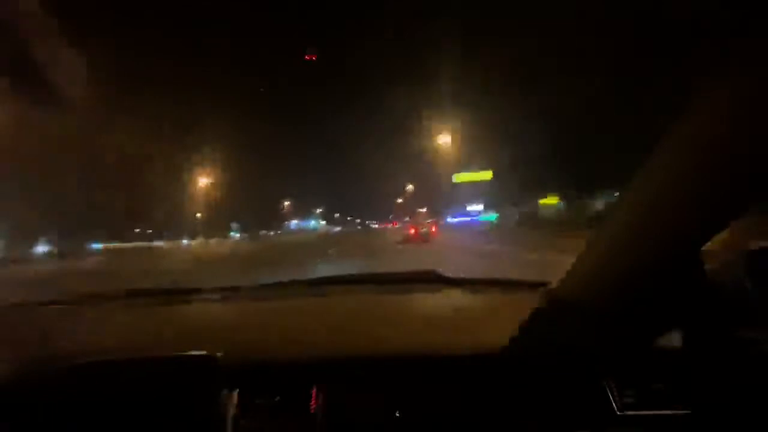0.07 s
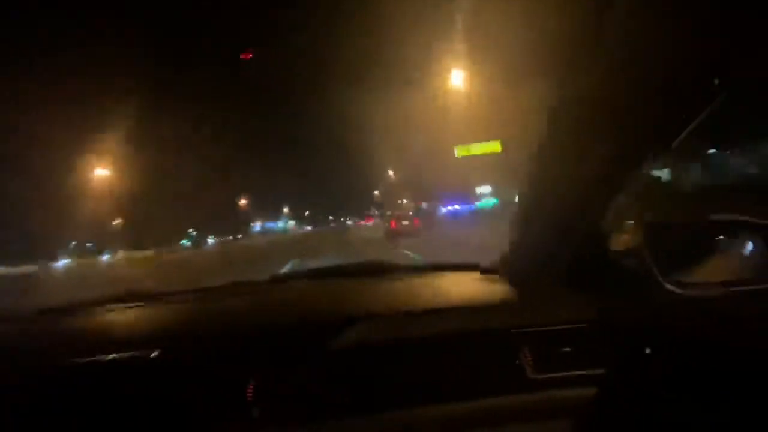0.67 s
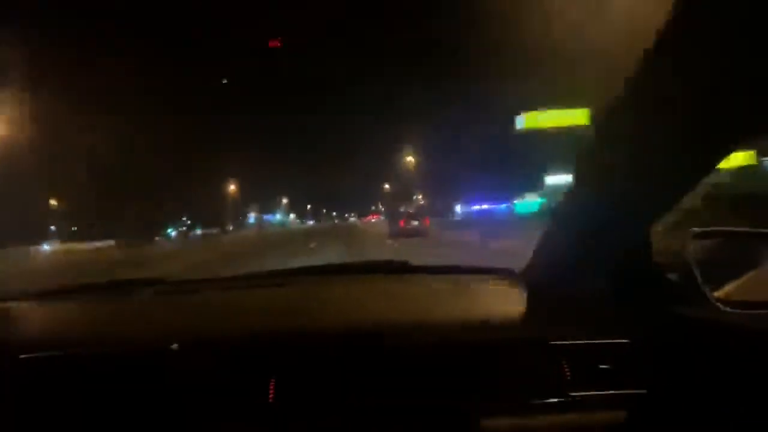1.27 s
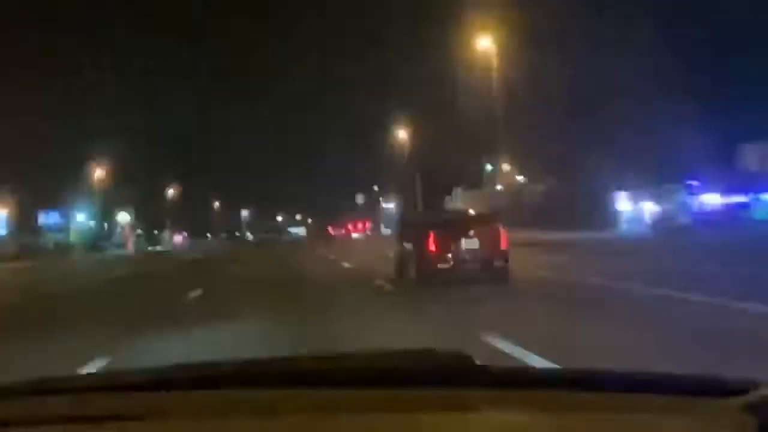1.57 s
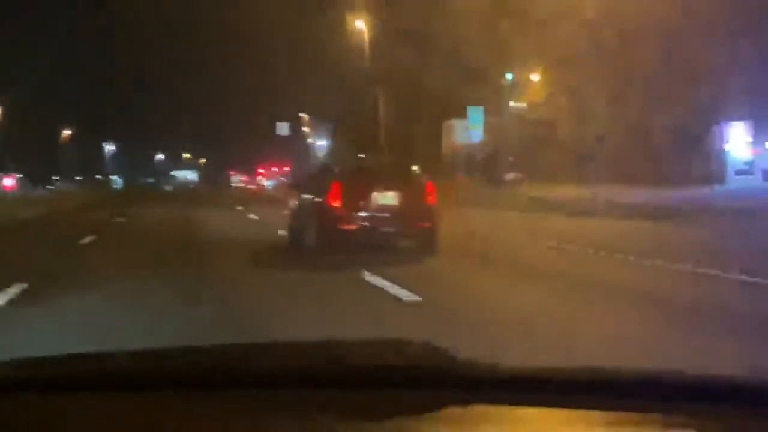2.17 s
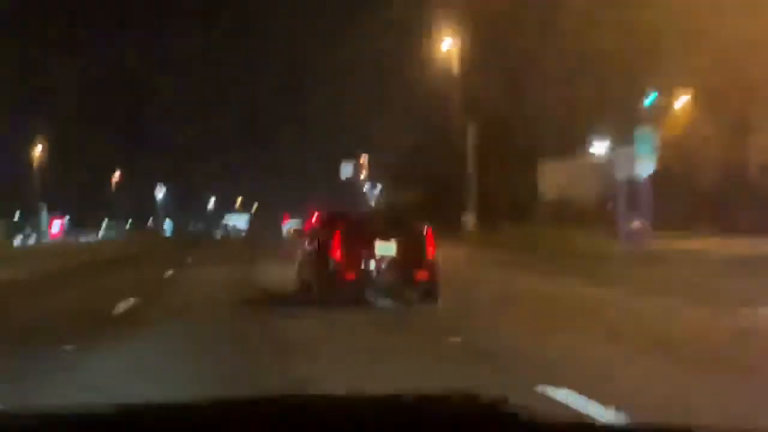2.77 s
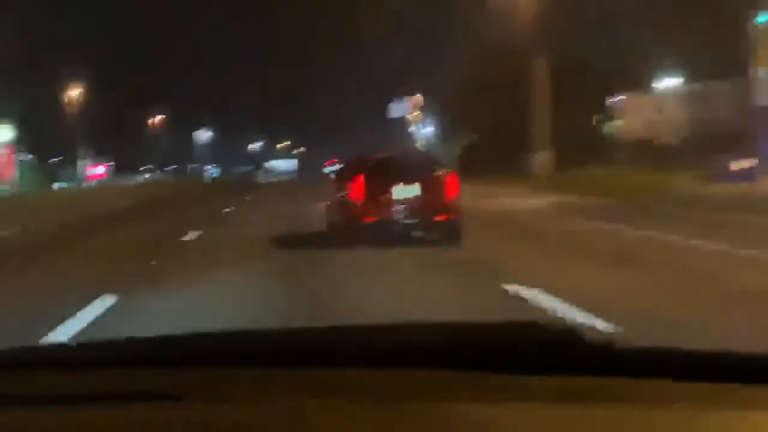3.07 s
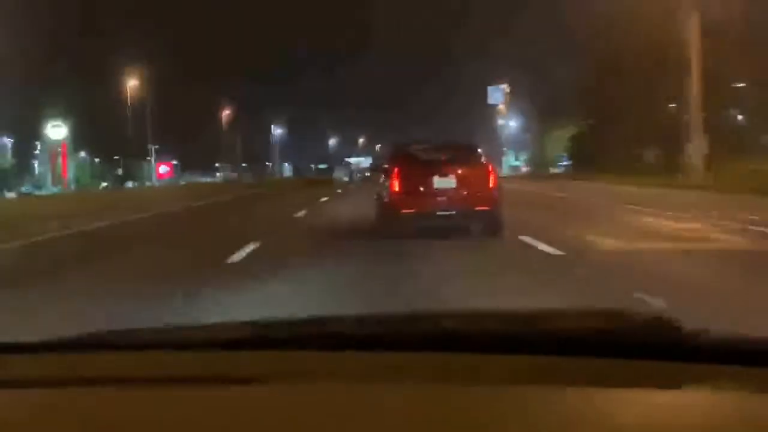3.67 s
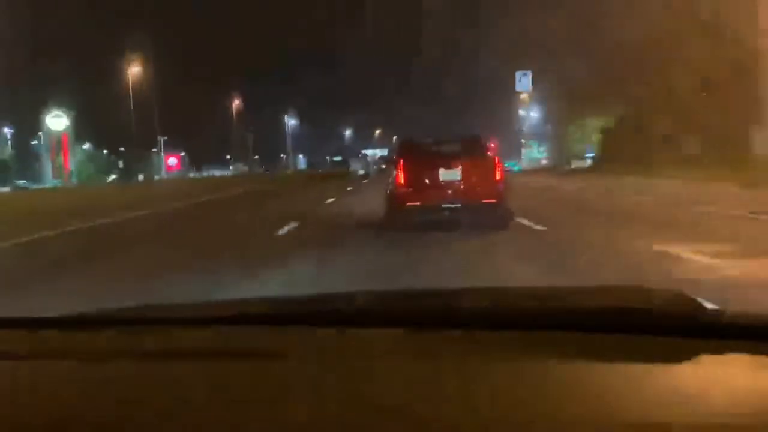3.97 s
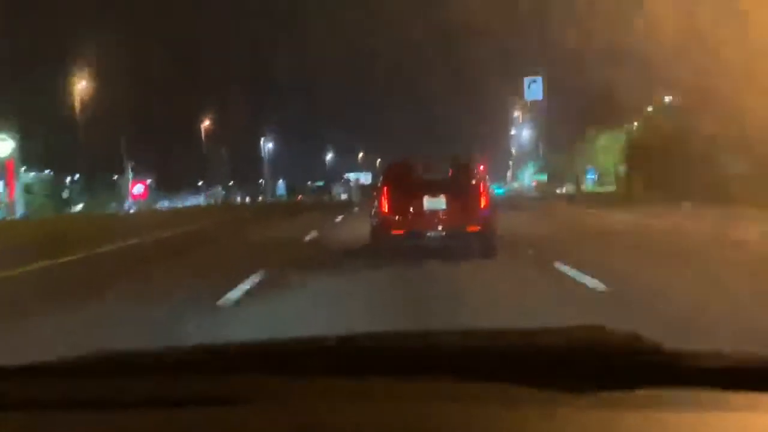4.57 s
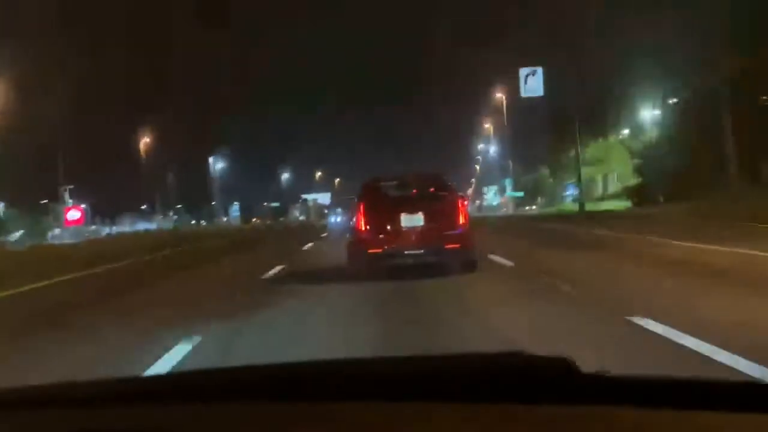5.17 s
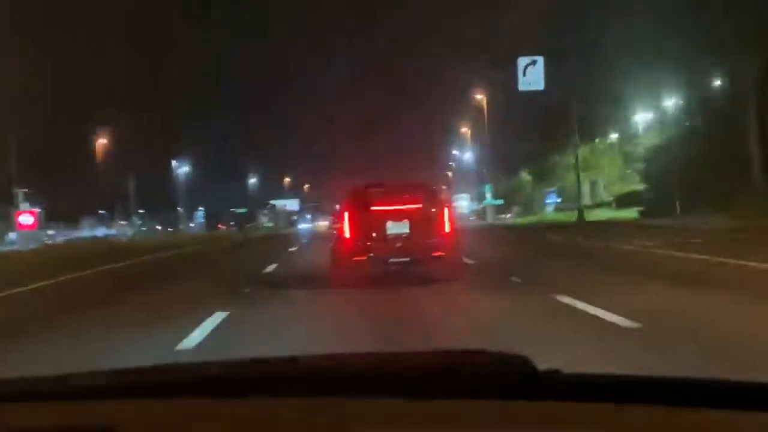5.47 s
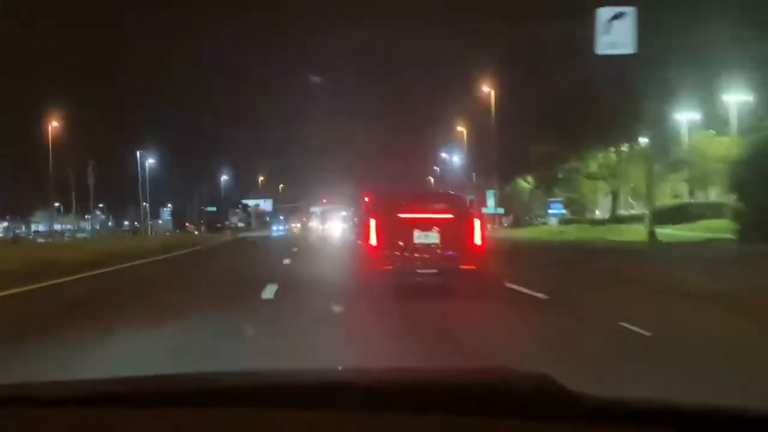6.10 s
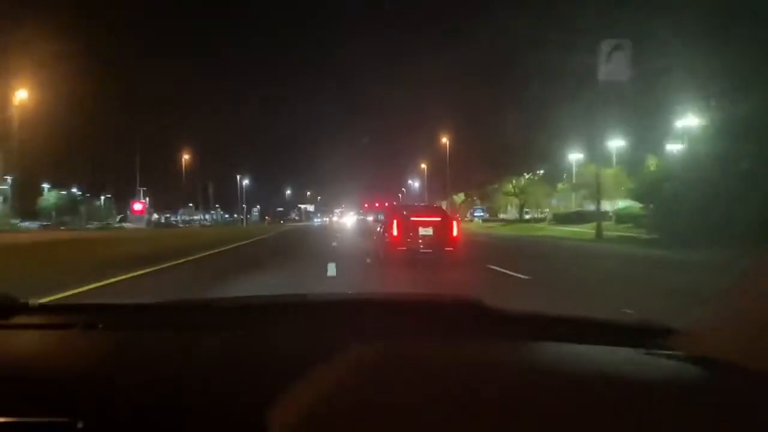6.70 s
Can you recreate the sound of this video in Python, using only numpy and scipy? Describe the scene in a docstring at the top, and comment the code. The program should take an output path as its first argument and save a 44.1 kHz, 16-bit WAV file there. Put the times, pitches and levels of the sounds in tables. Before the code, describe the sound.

A low road rumble fills the cabin of a moving car for about seven seconds, with steady tyre roar and a faint hiss of air. The engine pulls gently at first, and three barely audible chirps come in the first 1.2 seconds. At about 1.4 seconds the stereo sound narrows and turns a little duller. Around 2 seconds the engine eases into coasting, and a hum swells and fades by 3 seconds. The tyres ring faintly near 3.3 seconds. After a soft bump, a deep, wavering drone sets in at about 4.3 seconds and stays as the loudest sound to the end. Plastic trim ticks lightly at 4.8 and 5.5 seconds. Soft bumps come between 5.5 and 5.9 seconds, with a faint tyre whine that lingers as the engine sinks in pitch. The sound widens slightly just before the end.

```python
"""A car rumbling along a wide road at night, heard from inside on a camera's stereo microphone.
The road shakes the body, tyres roar through the floor and air hisses along the glass. The engine pulls
gently, then coasts and slows, its orders swelling in the cabin's resonances; a hum comes and goes and
a deep drone sets in. In the cabin, trim ticks twice and there are three faint chirps.
The camera zooms in and, at the end, partly out again, which narrows and widens the microphone's pickup."""
import sys
import numpy as np
from scipy.fft import rfft, irfft, next_fast_len
from scipy.io import wavfile
from scipy.ndimage import uniform_filter1d, minimum_filter1d, map_coordinates

SR = 44100
rng = np.random.default_rng(int(sys.argv[2]) if len(sys.argv) > 2 else 0)


def bounce(signal):
    """Save signal as a 16-bit WAV file at the path given by the first command-line argument."""
    frames = np.transpose(np.atleast_2d(signal))
    limited = np.clip(frames, -1, 1)
    pcm = np.round(limited * 32767).astype(np.int16)
    wavfile.write(sys.argv[1], SR, pcm)


N = 301644


def amp(db):
    """Decibels to gain."""
    return 10 ** (np.asarray(db) / 20)


def unit(x):
    """Scaled to rms 1."""
    return x / np.sqrt(np.mean(x ** 2) + 1e-20)


def along(points, hz):
    """Each column after the first, read at hz on a log frequency axis."""
    knots_hz, *columns = np.transpose(points)
    return np.array([np.interp(np.log(hz + 1), np.log(knots_hz + 1), c) for c in columns])


def curves(rows):
    """One value per sample for each column after the time."""
    seconds, *columns = np.transpose(rows)
    return [np.interp(np.arange(N) / SR, seconds, c) for c in columns]


def wobble(rate):
    """A smooth random curve, rate knots a second."""
    knots = rng.standard_normal(int(N * rate / SR) + 4)
    return map_coordinates(knots, [np.arange(N) * rate / SR])


def swell(start, attack, hold=np.inf, release=1):
    """A gain that rises from 0 to 1, holds and falls back; times in seconds."""
    t = np.arange(N) / SR - start
    return np.clip(t / attack, 0, 1) * np.clip(1 - (t - attack - hold) / release, 0, 1)


def since(start):
    """Seconds since a moment, 0 before it."""
    return np.maximum(np.arange(N) / SR - start, 0)


def bell(centre, width):
    """A smooth rise to 1 and fall around a moment; width is the half length in seconds."""
    return np.exp(-((np.arange(N) / SR - centre) / width) ** 2)


def filtered(x, response):
    """x shaped by a gain that depends on frequency."""
    size = next_fast_len(N + 8192)
    return irfft(rfft(x, size) * response(np.fft.rfftfreq(size, 1 / SR)), size)[..., :N]


def rush(spectrum, ripple_db=0, spacing_hz=60):
    """Two unrelated noises of rms 1 with the given spectrum; reflections off the glass can ripple it."""
    knots = rng.standard_normal(2048)
    ripple = lambda hz: np.interp(hz / spacing_hz, np.arange(len(knots)), knots)
    response = lambda hz: amp(along(spectrum, hz) + ripple_db * ripple(hz))
    return unit(filtered(rng.standard_normal((2, N)), response))


def steady(noise):
    """Noise held at rms 1 from moment to moment."""
    power = uniform_filter1d(uniform_filter1d(noise ** 2, size=4000), size=4000)
    return noise / np.sqrt(np.abs(power) + 1e-6)


def sides(balance_db):
    """Left and right gains of mean power 1; the balance is left over right."""
    gains = amp(np.array([balance_db, -balance_db]).reshape(2, -1) / 2)
    return gains / np.sqrt(np.mean(gains ** 2, axis=0))


def tone(hz, db, balance_db, lead=0):
    """A gliding sine; the cabin's standing waves give each side its own level and phase."""
    phase = 2 * np.pi * (np.cumsum(hz) / SR + rng.random())
    return np.sqrt(2) * amp(db) * sides(balance_db) * np.sin(phase + np.array([[lead], [-lead]]) / 2)


def pickup(field, alike, balance_db):
    """Left and right spectra from two unrelated ones, as alike as asked."""
    turn = np.arccos(np.clip(alike, -1, 1)) / 2
    mid, side = field[0] * np.cos(turn), field[1] * np.sin(turn)
    return sides(balance_db) * np.array([mid + side, mid - side])


def microphone(field, wide_lag_s=0.000284):
    """Zooming in narrows the pickup: diffuse noise turns duller and more mono, the sides fall in step."""
    # Each row: frequency in Hz; wide, the left-right likeness, balance in dB and gain in dB;
    # zoomed in, the likeness and balance in dB.
    pattern = [(60, 0.84, -5, 0.5, 0.97, -1.5), (130, 0.88, -3.5, 1.5, 1, -3),
               (260, 0.51, -3.5, 4.5, 0.65, -2.5), (505, 0.33, 0.5, 3.5, 0.33, -1),
               (706, 0.29, -2.5, 2.5, 0.043, -1.5), (1015, 0, 1.5, 4.5, 0.3, -0.5),
               (1770, 0.35, 3.5, 2, 0.25, 3.5), (2780, 0.13, 6, 14, 0.87, -1.5),
               (3750, 0.29, 5.5, 9.5, 1, 0), (4160, 0.088, 5, 11, 1, 0), (4900, 0, 5, 6.5, 1, 0.5),
               (5800, 0.031, 5, 13, 1, -0.5), (6940, 0, 5, 11, 1, 0), (8430, 0.28, -0.5, 12.5, 0.079, 1),
               (10460, 0.3, -2, 2, 0.25, 0), (13600, 0.5, 0, -1, 0.092, 0)]
    # Each row: time in seconds, zoom from 0 (wide) to 1 (narrow).
    zoom_moves = [(0, 0.12), (1, 0.14), (1.425, 0.023), (1.445, 0.99), (6.59, 1), (6.64, 0.49),
                  (6.84, 0.29)]
    size = next_fast_len(N + 8192)
    spectra, hz = rfft(field, size), np.fft.rfftfreq(size, 1 / SR)
    wide_alike, wide_balance, wide_db, zoom_alike, zoom_balance = along(pattern, hz)
    wide = irfft(amp(wide_db) * pickup(spectra, wide_alike, wide_balance), size)[:, :N]
    narrow = irfft(pickup(spectra, zoom_alike, zoom_balance), size)[:, :N]
    zoom, = curves(zoom_moves)
    left, right = (1 - zoom) * wide + zoom * narrow
    late_left = map_coordinates(left, [np.arange(N) - (1 - zoom) * wide_lag_s * SR], mode="mirror")
    return np.array([late_left, right])


def chirps(waver=0.017):
    """Short, unsteady chirps in the cabin, perhaps rubbing trim, barely rise above the road noise."""
    # Each row: time in seconds, pitch in Hz, level in dB.
    squeaks = [(0.235, 1190, -37), (0.608, 1200, -40), (1.19, 690, -32)]
    return sum(bell(s, 0.016) * tone(hz * (1 + waver * wobble(150)), db, balance_db=-1)
               for s, hz, db in squeaks)


def ticks(rise_s=0.00068, hold_s=0.0023, snap_s=0.0006, tilt_from_hz=4500):
    """Plastic trim in the cabin snaps free, rubs on briefly and knocks the panel behind it."""
    # Each row: start in seconds, level in dB, seconds to fall 60 dB, treble tilt in dB per octave,
    # knock against the slip in dB, lift of the snap in dB.
    slips = [(4.8003, -33.5, 0.043, -4, 0, 6), (5.5248, -35.5, .032, -2, 5, 2),
             (5.5324, -34.5, .047, -3.5, 0, 4), (5.558, -37.5, .065, -24, -7, 0)]
    # Spectra of the slip and the panel's knock. Each row: frequency in Hz, relative level in dB.
    slip_spectrum = [(2500, -17), (3900, -9.5), (4450, 2.5), (5400, 0), (6000, -2.5), (6700, 0), (7800, -9),
                     (9500, -7.5), (11200, -5), (12300, -13), (15000, -5), (16000, -13)]
    panel_colour = [(400, -17), (750, -8), (1250, -6), (1750, -1), (2350, -0.5), (3100, -11), (6000, -45)]
    out, t = np.zeros((2, N)), np.arange(4096) / SR
    hz = np.fft.rfftfreq(len(t), 1 / SR)
    burst = lambda db: unit(irfft(amp(db) * rfft(rng.standard_normal((2, len(t))))))
    for start, db, t60, tilt, knock_db, snap_db in slips:
        slip = burst(along(slip_spectrum, hz) + tilt * np.log2(np.maximum(hz / tilt_from_hz, 1)))
        snap = amp(snap_db * np.exp(-((t - rise_s) / snap_s) ** 2))
        knock = amp(knock_db) * burst(along(panel_colour, hz))
        envelope = np.minimum(t / rise_s, 1) * amp(db - 60 * np.maximum(t - hold_s, 0) / t60)
        mid, side = envelope * (snap * slip + knock)
        out[:, round(start * SR):][:, :len(t)] += [mid + 0.55 * side, mid - 0.5 * side]
    return out


def hum(start_s=1.96, pitch_hz=218.8, sag_hz_per_s=4.3, octave_db=-12.5, balance_db=-4):
    """A hum with a faint octave, right of centre, swells and fades as the pedal lifts, sinking a little."""
    hz = pitch_hz - sag_hz_per_s * since(start_s)
    db = -24.8 + 1.3 * wobble(12)
    envelope = swell(start_s, attack=0.24, hold=0.36, release=0.36)
    return envelope * (tone(hz, db, balance_db) + tone(2 * hz, db + octave_db, balance_db))


def drone(pitch_hz=121, overshoot_hz=11.5, settle_s=0.23, swing_s=0.51, sag_hz_per_s=0.91):
    """A low, wavering tone comes in sharp, swings down to its pitch and fills the cabin."""
    # It surges and falters before it holds. Each row: time in seconds, level in dB.
    surges = [(4.38, -13.5), (4.5, -11), (4.69, -16), (4.77, -10.5), (4.88, -11), (5.02, -14),
              (5.15, -11.5), (6.2, -11.5), (6.84, -11)]
    t = since(4.37)
    settling = overshoot_hz * np.exp(-t / settle_s) * np.cos(2 * np.pi * t / swing_s)
    hz = pitch_hz + settling - sag_hz_per_s * since(5.41)  # sinks as the car brakes
    db = curves(surges)[0] + 1.1 * wobble(15) + 0.7 * wobble(60)
    return swell(4.29, attack=0.11) * tone(hz, db, balance_db=-1)


def engine(lift_off_s=1.55, overrun_s=2.23, coast_under_load_db=-21.5):
    """Crankshaft orders shift their mix from pulling to coasting; each swells in a cabin resonance."""
    # The car gathers speed, coasts, then brakes. Each row: time in seconds, crankshaft turns a second.
    revs = [(0, 72), (.9, 73.8), (1.4, 76), (1.65, 78.2), (1.92, 78.1), (2.1, 76.4), (2.7, 76.5),
            (5.55, 70.4), (6.84, 61.8)]
    # How hard the engine pulls. Each row: time in seconds, gain on the pulling levels in dB.
    effort = [(0, -13), (.7, -6.5), (1.45, -8), (1.63, -2.5), (2.0, -2), (2.25, -18.5), (3.5, -16),
              (4.3, -19)]
    # Each row: multiple of the crankshaft speed, base levels pulling and coasting in dB,
    # balance in dB, lead of the left side in radians.
    orders = [(2, -25, -23, 0, 0), (3, -32, -48, 0, -4), (4, -33.5, -46.5, -4, -0.1), (5, -37, -59, 12, 4),
              (6, -38, -64, -7.5, -1), (7, -71.5, -44, -6, 1), (8, -42, -53, 5, 4),
              (9, -57.5, -48, 6.5, 1.5), (10, -39, -57.5, -0.5, 0.5), (11, -59, -52, 3, 0.5),
              (16, -55, -52, -4, -5)]
    # Resonances of the cabin air. Each row: centre in Hz, half width in Hz, lift in dB.
    resonances = [(153.4, 3.5, 2.5), (306.6, 13.3, 10.5), (376, 6.5, 6.5), (497.6, 28, 12.5), (592, 14, 7),
                  (645, 14.5, 12), (782, 7, 6.5)]
    speed = curves(revs)[0] * (1 + 0.00072 * wobble(14))
    pull_db, = curves(effort)
    coast_db = coast_under_load_db * (1 - swell(lift_off_s, overrun_s))
    out = np.zeros((2, N))
    for multiple, pulling_db, coasting_db, balance_db, lead in orders:
        hz = multiple * speed
        drive = np.hypot(amp(pulling_db + pull_db), amp(coasting_db + coast_db))
        lift_db = sum(db / (1 + ((hz - centre) / width) ** 4) for centre, width, db in resonances)
        out += drive * tone(hz, lift_db + 0.9 * wobble(9), balance_db, lead)
    return out


def air(surface_db):
    # The hiss with the coding's gaps. Each row: frequency in Hz, relative level in dB.
    coded_hiss_spectrum = [(800, -27), (1400, 0.5), (1700, 5.5), (2050, 1), (2300, 0), (2700, -1),
                           (3600, -2.5), (5100, -4), (5900, -8.5), (7200, -9.5), (8500, -18), (9600, -9),
                           (10800, -10.5), (12100, -36), (13600, -8), (15000, -18), (16000, -14)]
    hiss = rush(coded_hiss_spectrum, ripple_db=0.7)
    dip_db = -4 * bell(4.32, 0.021) - 3 * bell(4.66, 0.021)  # the level dips briefly twice
    return amp(-45 + 1.6 * surface_db + dip_db + 0.95 * wobble(18)) * hiss


def tyres(surface_db, sing_at_s=5.7, sing_width_s=0.19):
    """Tyres roar through the floor and ring on a coarse patch; later the tread sings and lingers."""
    # Colours of the roar, the singing tread and the ring. Each row: frequency in Hz, relative level in dB.
    roar_colour = [(130, -29), (230, -1), (370, 2.5), (450, -4.5), (560, -4.5), (690, -5), (850, -4),
                   (950, -13), (1150, -11), (1480, -16.5), (1690, -13), (2030, -18.5), (2250, -19),
                   (2600, -24.5), (4000, -35.5), (8000, -80)]
    tread_colour = [(850, -29), (1030, 6), (1150, 10), (1300, -13), (1680, -1), (2000, -25), (3000, -38),
                    (6000, -120)]
    ring_colour = [(680, -30), (770, -5), (850, 0), (900, -12), (1000, -35), (1600, -120)]
    # Patches of asphalt. Each row: time in seconds, half length in seconds, change of the roar in dB.
    patches = [(2.441, 0.37, 0.4), (2.978, 0.13, -1.1), (3.317, .13, 1), (4.297, 0.17, 1)]
    patch_db = sum(db * bell(s, width) for s, width, db in patches)
    roar = amp(-28 + surface_db + patch_db + 0.91 * wobble(12)) * rush(roar_colour)
    singing = amp(-38) * bell(sing_at_s, sing_width_s) + amp(-47.5) * swell(sing_at_s, sing_width_s)
    sing = singing * rush(tread_colour)
    ring = amp(-37) * bell(3.34, 0.13) * rush(ring_colour)
    return roar + sing + ring


def rumble(shake_db=-19.5, wander_db=1.7, boom_db=-22):
    """The road shakes the body all round the microphone, harder at bumps; the floor pan booms evenly."""
    # Colours of the body and the floor pan. Each row: frequency in Hz, relative level in dB.
    body_colour = [(12, -28), (23, -15), (30, -6), (39, -4), (48, 1.5), (66, 1), (85, -2.5), (110, -9),
                   (150, -19.5), (300, -67.5)]
    pan_colour = [(60, -18), (105, -3), (140, 1), (165, -2), (192, -3), (230, -12.5), (300, -23),
                  (500, -75.5)]
    # Unevenness of the road, which drives both. Each row: time in seconds, gain in dB.
    unevenness = [(0, -1), (.6, -2), (1.3, -1), (2.2, 1.1), (2.85, 0), (3.3, -0.7), (3.9, 2), (4.3, 0.5),
                  (5.8, 1), (6.3, -0.5), (6.84, -0.5)]
    # The larger bumps. Each row: time in seconds, lift of the shake in dB.
    jolts = [(3.52, 2), (4.25, 6.5), (5.0, 2.5), (5.55, 6.5), (5.72, 1.5), (5.89, 4.5)]
    road_db, = curves(unevenness)
    jolt_db = sum(db * bell(s, 0.047) for s, db in jolts)
    shake = amp(shake_db + jolt_db + wander_db * wobble(14)) * steady(rush(body_colour))
    boom = amp(boom_db) * steady(rush(pan_colour))
    return amp(road_db) * (shake + boom)


def scene():
    """Diffuse road noise through the zooming microphone, with engine, low tones and trim on top."""
    # Coarseness of the asphalt. Each row: time in seconds, gain in dB.
    asphalt = [(0, -1), (3, -0.2), (3.4, 0.5), (3.9, 0.74), (4.33, -0.8), (4.5, -0.3), (5.2, 0.2), (6.3, 2),
               (6.84, 0)]
    surface_db, = curves(asphalt)
    road = microphone(rumble() + tyres(surface_db) + air(surface_db))
    return road + engine() + hum() + drone() + ticks() + chirps()


def record(dry, ceiling_db=-1, fade_s=0.004, top_hz=15400):
    """The camera eases its gain down at peaks over the ceiling and keeps nothing above its band limit."""
    needed = np.minimum(1, amp(ceiling_db) / (np.abs(dry).max(axis=0) + 1e-9))
    gain = uniform_filter1d(minimum_filter1d(needed, size=900), size=900)
    soft_ends = swell(0, fade_s, N / SR - 2 * fade_s, fade_s)
    return filtered(dry * gain * soft_ends, lambda hz: hz < top_hz)


dry = scene()
out = record(dry)
bounce(out)
```